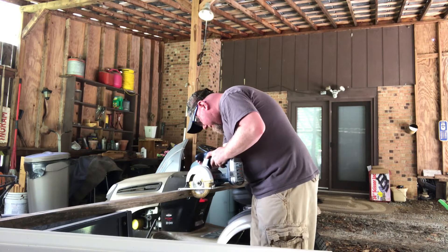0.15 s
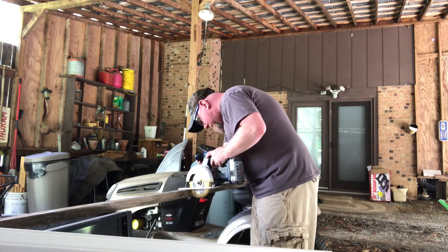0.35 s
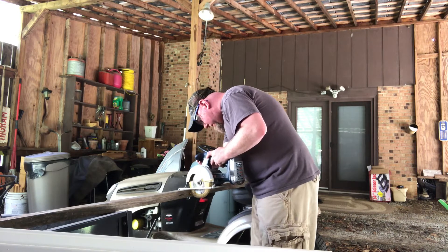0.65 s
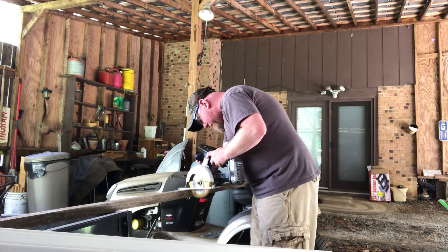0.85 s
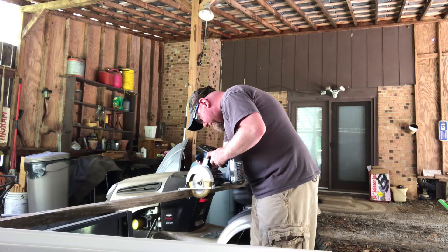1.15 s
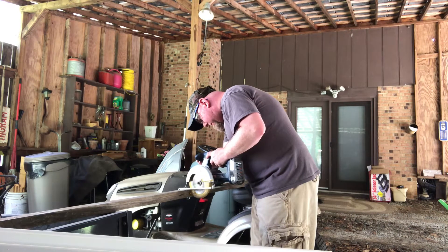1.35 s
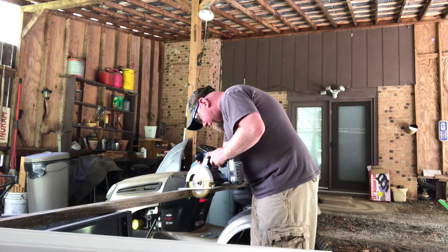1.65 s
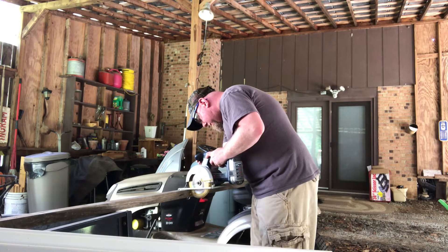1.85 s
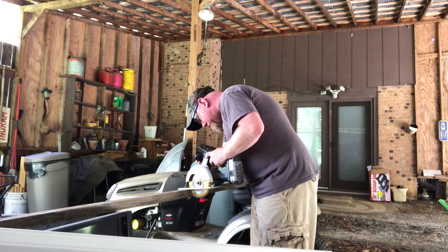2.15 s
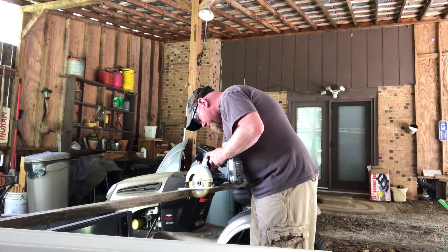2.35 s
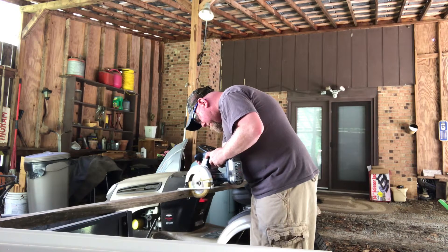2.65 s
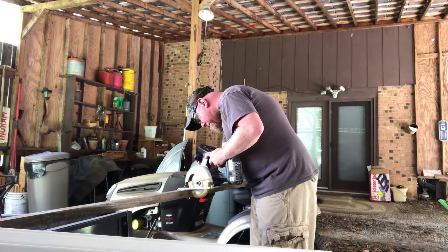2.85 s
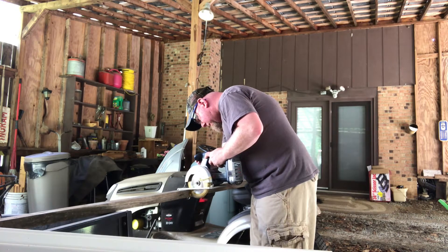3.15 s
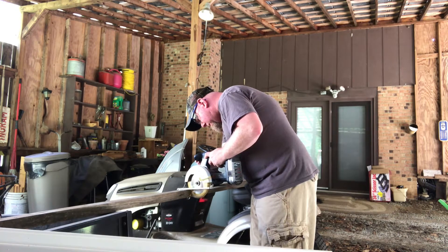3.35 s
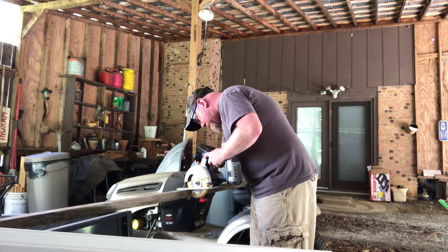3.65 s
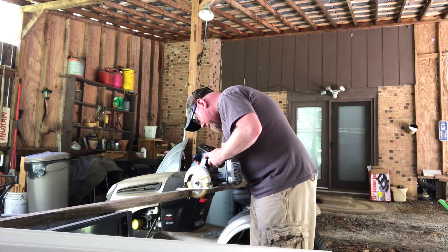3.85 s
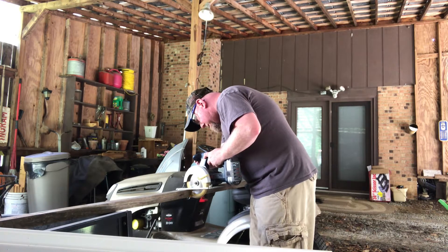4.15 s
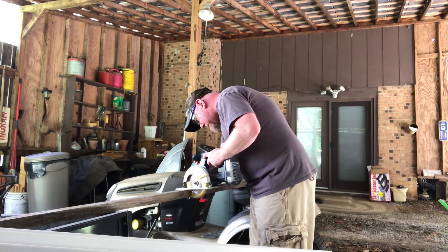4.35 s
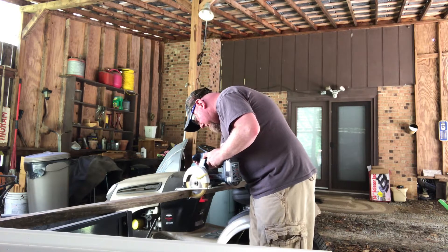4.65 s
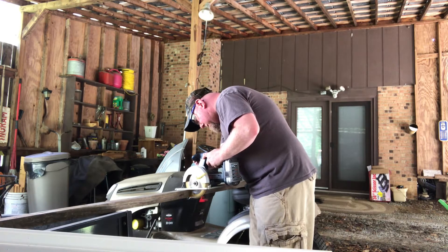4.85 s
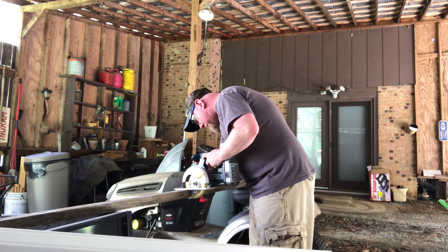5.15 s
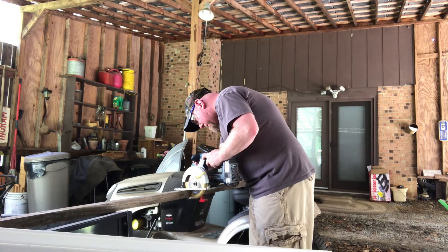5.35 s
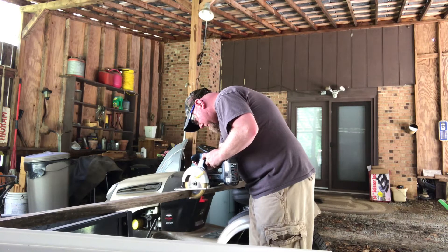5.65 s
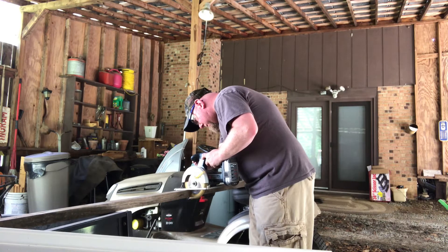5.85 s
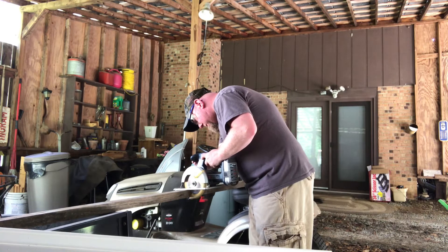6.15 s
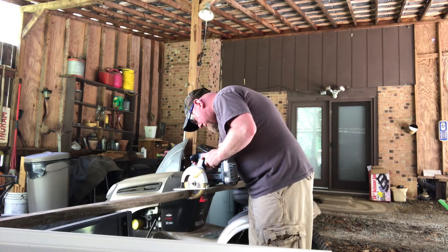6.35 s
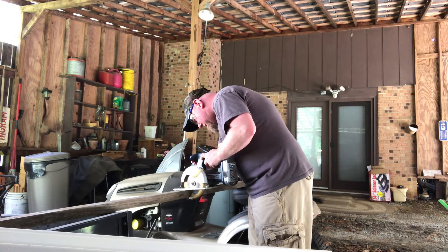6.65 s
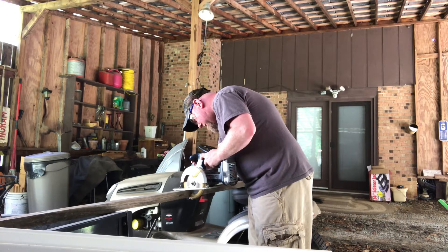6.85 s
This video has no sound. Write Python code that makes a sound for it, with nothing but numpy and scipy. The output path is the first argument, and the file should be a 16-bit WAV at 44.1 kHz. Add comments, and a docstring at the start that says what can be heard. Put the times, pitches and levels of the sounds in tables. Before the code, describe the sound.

Nearly a second of quiet: low outdoor rumble, thin insect hiss and a few light ticks against wood. A cordless circular saw jolts on with hard knocks, whirs up quickly, then touches the board. The blade rings and rasps lightly, then bites harder, becoming a loud screeching, howling cut that sags in pitch and keeps running to the end. Fairly close microphone in an open carport with short reflections.

```python
"""A circular saw clatters into motion, spins up and cuts a board in a carport.
Light contact rings the steel blade; deeper in, tooth impacts excite rasp, screech and bending modes.
A tone at the tooth rate howls near blade resonances while the loaded motor slows.
Gears, brushes, rotor and fan follow the motor's turns; filtered noise and decaying blows add knocks.
Insects and a low outdoor rumble, made of coloured noise, lie beneath and are plainest before the start."""
import sys
import numpy as np
from scipy import signal
from scipy.fft import rfft, irfft, next_fast_len
from scipy.io import wavfile
from scipy.ndimage import map_coordinates

SR = 44100
rng = np.random.default_rng(int(sys.argv[2]) if len(sys.argv) > 2 else 0)


def log_audio(samples):
    """Write samples as a 16-bit WAV file to the path given in sys.argv[1]."""
    # one column per channel
    frames = np.atleast_2d(samples).T
    # limit to full scale, then quantise
    limited = np.clip(frames, -1, 1)
    pcm = np.round(limited * 32767).astype(np.int16)
    wavfile.write(sys.argv[1], SR, pcm)


N = 308259

TEETH, GEAR_RATIO = 24, 14 / 3  # motor turns per blade turn
START_S = .885  # trigger pulled
FREE_SPEED = 338.5  # motor turns per second without load
CONTACT_S, ENTERED_S = 1.36, 1.54  # teeth first touch the board, and are fully on it

# Bending modes of the blade: mode_hz, width_hz, relative_db
BENDING_MODES = [(1310, 50, -10), (1372, 35, -3), (1440, 24, 1), (1555, 40, -2), (1630, 24, -4)]
# How hard the teeth bite: time_s, bite_db
BITE_FORCE = [(1.45, -35), (1.48, -30), (1.83, -27), (1.93, -34), (2.03, -28), (2.13, -32), (2.2, -22),
              (2.36, -20), (2.5, -30), (2.82, -19), (3.28, -24), (3.45, -21), (3.82, -23), (3.87, -18),
              (4.19, -21), (4.27, -15), (4.94, -18), (6.98, -19)]


def amp(db):
    """Logarithmic level: decibels to linear gain."""
    return 10 ** (np.asarray(db) / 20)


def unit(x):
    """Power normalisation: scale to rms 1."""
    return x / np.sqrt(np.mean(x ** 2) + 1e-20)


def along(points, hz):
    """Logarithmic frequency: read (Hz, value) points on a log axis."""
    f, v = np.transpose(points)
    return np.interp(np.log(hz + 1), np.log(f + 1), v)


def curves(rows):
    """Linear interpolation: one value per sample for each column after the time."""
    s, *cols = np.transpose(rows)
    return [np.interp(np.arange(N) / SR, s, c) for c in cols]


def ramp(start, end):
    """Linear onset: rises from 0 to 1 between two times."""
    return np.clip((np.arange(N) / SR - start) / max(end - start, 1 / SR), 0, 1)


def blows(events):
    """Exponential decay: each (s, dB, length s) blow falls by 60 dB in its length."""
    t = np.arange(N) / SR
    return sum((t >= s) * amp(db - 60 * np.abs(t - s) / length) for s, db, length in events)


def swells(events):
    """Gaussian modulation: sum of (s, dB, half-length s) bell-shaped level changes, in dB."""
    t = np.arange(N) / SR
    return sum(db * np.exp(-((t - s) / half) ** 2) for s, db, half in events)


def wobble(rate):
    """Band-limited fluctuation: a smooth random curve with rate knots a second."""
    knots = rng.standard_normal(int(N * rate / SR) + 4)
    return map_coordinates(knots, [np.arange(N) * rate / SR])


def noise():
    """Flat power spectrum: fresh white noise."""
    return rng.standard_normal(N)


def filtered(x, response):
    """Linear filtering: multiply the spectrum of x by a response of frequency."""
    size = next_fast_len(N + SR // 2)
    return irfft(rfft(x, size) * response(np.fft.rfftfreq(size, 1 / SR)), size)[:N]


def coloured(x, spectrum):
    """Spectral shaping: x through a broad (Hz, dB) spectrum, at rms 1."""
    return unit(filtered(x, lambda hz: amp(along(spectrum, hz))))


def resonate(x, modes):
    """Modal superposition: x through (Hz, width Hz, dB) modes, weak below the lowest, at rms 1."""
    lowest = min(mode[0] for mode in modes)

    def response(f):
        total = 0
        for k, (centre, width, db) in enumerate(modes):
            damping = 1j * f * width
            # neighbouring modes have opposite signs
            total = total + (-1) ** k * amp(db) * damping / (centre * centre - f * f + damping)
        return total * np.minimum(f / lowest, 1) ** 2

    return unit(filtered(x, response))


def impacts(cycles, depth):
    """Amplitude modulation: noise that bursts once a cycle, at rms 1."""
    return unit(noise() * np.exp(depth * np.cos(2 * np.pi * cycles)))


def outdoors():
    """Superposed noise bands: distant rumble, faint drone, insects and a brief thin tone."""
    # Rumble level: time_s, level_db
    rumble_level = [(0, -57.5), (2.3, -59.5), (4.6, -56), (5.6, -66), (6.99, -66)]
    # Rumble spectrum: frequency_hz, relative_density_db
    rumble_spectrum = [(20, -56), (54, -1.5), (100, -4.5), (175, -8), (250, -15.5), (430, -22), (560, -18),
                       (740, -24), (950, -21), (1200, -26), (2500, -31), (4500, -38), (6000, -38),
                       (12000, -52)]
    # Insect band: frequency_hz, relative_density_db
    insect_spectrum = [(6000, -37), (7100, -13), (7850, 0), (8300, -9), (9000, -32), (14000, -42)]
    rumble_db, = curves(rumble_level)
    rumble = amp(rumble_db) * coloured(noise(), rumble_spectrum)
    drone = amp(-73) * resonate(noise(), [(555, 8.3, 0)])
    insects = amp(-62.0) * coloured(noise(), insect_spectrum)
    thin_db, = curves([(.25, -100), (.4, -72), (.62, -72), (.76, -73), (.85, -95)])
    thin = amp(thin_db) * resonate(noise(), [(3210, 70, 0)])
    return rumble + drone + insects + thin


def carport(x):
    """Reverberation: roof and walls answer with decaying noise whose high treble dies first."""
    # Decay time of the reflections: frequency_hz, t60_s
    decay_times = [(200, 0.27), (2000, 0.32), (12000, 0.066)]
    hz, t, z = signal.stft(rng.standard_normal(SR // 2), SR, nperseg=256)
    decay = amp(-60 * t / along(decay_times, hz)[:, None])
    tail = signal.istft(z * decay, SR, nperseg=256)[1]
    return signal.fftconvolve(x, tail / np.linalg.norm(tail))[:N]


def handling():
    """Light impact: the saw's shoe ticks against the board as it is lined up."""
    # Ticks before the start: start_s, level_db, decay_60db_s
    ticks = [(.15, -73, .2), (.53, -53.5, 0.14), (.75, -66, .25)]
    return blows(ticks) * coloured(noise(), [(700, -25), (1700, -2), (6500, 0), (11000, -25)])


def squeak():
    """Phase modulation: a brief, slightly unsteady squeak in the cut rises quickly and fades."""
    pitch_hz, level_db = 1110, -36
    start_s, rise_s, fade_s = 5.63, .03, .28
    envelope = ramp(start_s, start_s + rise_s) * (1 - ramp(start_s, start_s + fade_s))
    phase = 2 * np.pi * pitch_hz * np.arange(N) / SR + .6 * wobble(25)
    return amp(level_db) * envelope * unit(np.sin(phase))


def backlash():
    """Impact excitation: slack gear teeth slam and shake the housing; the first jolt rings the guard."""
    # Knocks as the motor takes up the blade: start_s, level_db, decay_60db_s
    knocks = [(.8905, -18, .04), (.901, -23, 0.05), (.912, -19.5, 0.18), (.944, -19.5, 0.12),
              (.959, -28, 0.11), (.974, -22, 0.066), (1.029, -24, 0.24)]
    # Housing spectrum: frequency_hz, relative_density_db
    housing_spectrum = [(120, -56), (200, -26), (282, -26), (338, -49), (419, -31), (761, -50), (929, -7),
                        (1290, 1), (1750, -5.5), (3540, -12.5), (4310, 2), (4980, -51), (10300, -30),
                        (12300, -11), (15000, -17)]
    housing = blows(knocks) * coloured(noise(), housing_spectrum)
    guard_modes = [(3130, 150, -1), (3520, 140, -5), (4450, 110, -15)]
    guard = blows([(.8895, -20, 0.065)]) * resonate(noise(), guard_modes)
    return housing + guard


def rotor_hum(turns, speed):
    """Rotational harmonics: the rotor hums at one to three times its turn rate, louder with speed."""
    free_db, sag_db = -42.3, .32  # level at free speed; dB lost per turn a second below it
    # Brief dips in level: time_s, change_db, half_length_s
    dips = [(1.52, -14, .04), (2.85, -6, .08), (3.42, -11, .13), (5.85, -10, .2)]
    hum_db = free_db - sag_db * (FREE_SPEED - speed) + swells(dips)
    angle = 2 * np.pi * turns
    harmonics = np.sin(angle) + amp(-11) * np.sin(2 * angle) + amp(-17) * np.sin(3 * angle)
    return amp(hum_db) * unit(harmonics)


def fan_whistle(turns):
    """Blade-passing tone: a twelve-bladed fan on the rotor whistles, far fainter once cutting begins."""
    level_db, cutting_change_db = -36.5, -20
    entry_s, rise_s = 1.09, .08
    fan_db = level_db + cutting_change_db * ramp(1.45, 1.53)
    tone = unit(np.sin(12 * 2 * np.pi * turns))
    return ramp(entry_s, entry_s + rise_s) * amp(fan_db + wobble(26.6)) * tone


def gear_rattle(turns, speed, allowed_speed):
    """Contact modulation: gears rattle once a turn, more as they run up, less when load holds them."""
    free_db, sag_db = -29.7, 7.2  # level at free speed; dB lost when bogged down
    bogged_speed = 270  # motor turns per second
    # Gear spectrum: frequency_hz, relative_density_db
    gear_spectrum = [(88, -48), (150, -17), (199, -23), (320, -11), (363, -13.5), (564, -4.5), (773, -12.5),
                     (980, -5), (1060, -9.5), (1600, 2), (2190, -6.5), (2730, -2), (3860, -3.5),
                     (4740, -10.5), (6500, -16), (8450, -38), (14300, -120)]
    load = (FREE_SPEED - allowed_speed) / (FREE_SPEED - bogged_speed)
    run_up = (1 + speed / allowed_speed) / 2
    level = amp(free_db - sag_db * load ** 2) * run_up
    return level * coloured(impacts(turns, depth=0.46), gear_spectrum)


def brush_hiss(turns):
    """Commutation noise: brushes spark twice a turn, most strongly under the starting current."""
    # Brush spectrum: frequency_hz, relative_density_db
    brush_spectrum = [(4500, -8), (6400, -8), (7300, 2), (7750, -7), (8900, 6), (10500, -9), (12200, 4),
                      (14500, -6), (15800, -10)]
    surge = blows([(.94, -27, 2.4)])
    level = amp(-43) + surge
    return level * coloured(impacts(2 * turns, depth=0.41), brush_spectrum)


def motor(turns, speed, allowed_speed):
    """Source superposition: gear rattle and brush hiss start together just after the trigger is pulled."""
    running = ramp(START_S + .003, START_S + .007)
    return running * (gear_rattle(turns, speed, allowed_speed) + brush_hiss(turns))


def board(blade_turns):
    """Forced vibration: run-out shakes the board, its thrum moving from second to third order."""
    over_bite_db, from_s = -38, 2.75
    # The board shakes harder: time_s, change_db, half_length_s
    thrums = [(4.27, 6, .06), (6.38, 8, .06), (6.66, 6, .08)]
    bite_db, = curves(BITE_FORCE)
    shift, = curves([(5, 0.11), (5.4, 1)])
    angle = 2 * np.pi * blade_turns
    second = (1 - 0.91 * shift) * np.sin(2 * angle)
    third = (0.19 + 0.93 * shift) * np.sin(3 * angle)
    thrum = second + third + 0.39 * np.sin(4 * angle)
    wood = resonate(noise(), [(135, 17, -0.88), (162, 24, 0), (253, 12, -1.2)])
    level = amp(bite_db + over_bite_db + swells(thrums) + 1.7 * wobble(12))
    return ramp(from_s, from_s + .1) * level * (thrum + wood / 2)


def howl(blade_turns, tooth_hz):
    """Resonance: the tooth-rate tone swells at bending modes; unequal teeth add lines one turn rate apart."""
    # Drive of the howl on a bending mode: time_s, drive_db
    push = [(3.8, -40), (4.1, -18.5), (4.45, -18.5), (4.97, -13.5), (5.25, -21), (5.52, -20), (5.85, -28),
            (6.14, -13), (6.35, -20), (7, -28)]
    push_db, = curves(push)
    in_tune = sum(amp(db) / (1 + (2 * (tooth_hz - hz) / width) ** 2)
                  for hz, width, db in BENDING_MODES)
    load, = curves([(3.6, 0.02), (4.3, 1)])
    angle = 2 * np.pi * blade_turns
    tooth = TEETH * angle + .12 * wobble(70)
    tone = in_tune * amp(push_db + .8 * wobble(60)) * unit(np.sin(tooth))
    octave_db = -44 + swells([(5.3, 14, .15)])  # the octave sings out where the motor first bogs down
    octave = amp(octave_db + 2.2 * wobble(7)) * unit(np.sin(2 * tooth + 0.33 * wobble(34)))
    unequal = sum(amp(-46 + 4 * wobble(7)) * np.sin(order * angle + wobble(9))
                  for order in range(22, 43))
    return ramp(CONTACT_S, ENTERED_S) * (tone + load * (octave + amp(-1) * unequal))


def follow(bite_db, grows):
    """Power-law growth: a layer gains grows dB per dB of bite, pivoting on a full cut."""
    full_bite_db = -19
    return full_bite_db + grows * (bite_db - full_bite_db)


def torn_wood(bite_db, strikes):
    """Fracture noise: teeth tear fibres into a rasp and grab at the board's edge."""
    # Grabs at the edge: start_s, level_db, decay_60db_s
    catches = [(1.523, -27, 0.12), (1.603, -26, 0.14), (1.744, -27, 0.15), (1.829, -27, 0.14),
               (2.069, -34, .14), (2.259, -20, 0.1), (2.316, -25, 0.12), (2.357, -25, 0.084)]
    # Torn wood spectrum: frequency_hz, relative_density_db
    rasp_spectrum = [(60, -48), (130, -29), (750, -19.5), (1200, -2), (2500, -1.5), (3100, -3.5), (4500, 2),
                     (5200, 2.5), (6000, 3.5), (7700, -2), (8550, 5.5), (10700, -3), (11400, 3.5),
                     (13600, 4), (15800, 0.5)]
    rasp_db = np.minimum(follow(bite_db, 1.3), bite_db) + 1.2
    return (amp(rasp_db) + blows(catches)) * coloured(strikes(), rasp_spectrum)


def kerf_modes(bite_db, strikes):
    """Modal excitation: tooth blows drive blade modes in the kerf, stronger with depth."""
    # Blade modes in the kerf, besides the rim's: mode_hz, width_hz, relative_db
    modes = [(2450, 45, -12), (3400, 80, -7), (3880, 40, -6), (4950, 80, -5), (5640, 70, -1), (5985, 55, 1),
             (6800, 60, -5), (7295, 40, -6), (8440, 120, -5), (8740, 80, -3), (10100, 90, -5),
             (11300, 120, -7), (13500, 200, -8)]
    depth_db, = curves([(2, -10), (3.4, -2), (4.5, 0)])
    return amp(bite_db - 2.8 + depth_db) * resonate(strikes(), modes)


def rim_screech(bite_db, strikes):
    """Frictional damping: the kerf broadens the rim's two sharp modes into a growing screech."""
    # Rim modes in the kerf: mode_hz, width_hz, relative_db
    pinched_modes = [(4174, 110, 0), (4310, 42, -4), (4315, 77, -5), (4455, 110, -1.5)]
    # The rim rubs the side of the kerf and squeals: time_s, change_db, half_length_s
    rubs = [(1.85, 12, .025), (2.355, 7, .04), (2.63, 4, .025), (3.25, 5, .12), (3.47, 5, .02),
            (3.6, 5, .025), (3.71, 5, .025), (3.93, 3, .025), (4.14, 4, .025)]
    pinched, = curves([(3.3, 0.044), (4.8, 0.96)])
    sharp = resonate(strikes(), [(4165, 22, -1.3), (4280, 24, 0.51)])
    broad = resonate(strikes(), pinched_modes)
    rim = np.sqrt(1 - pinched) * sharp + np.sqrt(pinched) * broad
    bind_db = 4.5 * ramp(4.3, 6.5)  # the kerf closes on the rim
    return amp(follow(bite_db, 1.05) - 3.6 + bind_db + swells(rubs)) * rim


def blade_flex(bite_db, strikes):
    """Bending resonance: tooth blows flex the blade, more or less as it is steered."""
    # The blade is steered: time_s, change_db, half_length_s
    twists = [(2.68, 4.5, .13), (3.3, -4, .15), (3.66, 6, .15)]
    level = amp(follow(bite_db, 1.15) - 6.5 + swells(twists))
    return level * resonate(strikes(), BENDING_MODES)


def free_ring(bite_db):
    """Modal ringing: wavering sines and noise-driven steel modes, damped while the blade is buried."""
    # Modes of the free blade: mode_hz, relative_db
    blade_modes = [(2143, -36), (2676, -39), (3047, -44), (3192, -37), (3316, -40), (3424, -43),
                   (3666, -45), (3876, -38), (4048, -43), (4161, -36), (4269, -31), (4463, -43),
                   (4694, -48), (5060, -43), (5276, -41), (5604, -41), (5744, -45), (6029, -41),
                   (6298, -45), (6751, -46), (7321, -42), (8463, -42), (8791, -43), (9921, -43),
                   (10164, -48), (11316, -46), (11881, -48), (13501, -47)]
    # Ringing against the loosely followed bite: time_s, level_db
    ring_level = [(1.5, -9), (2.0, -4.5), (2.8, -.5), (3.3, -6), (4.2, -10), (4.7, -19), (7, -11)]
    t = np.arange(N) / SR
    steady = unit(sum(amp(db + 2 * wobble(14)) * np.sin(2 * np.pi * hz * t + .6 * wobble(25))
                      for hz, db in blade_modes))
    shaken = resonate(noise(), [(hz, 16, db) for hz, db in blade_modes])
    radiated = [(2140, -4), (2700, 1.5), (3900, 1.5), (4160, -1),
                (4270, -7), (4700, 2), (14000, 2)]  # Hz, dB
    ring_db, = curves(ring_level)
    # the steel rings on, so it follows the bite only loosely
    return amp(follow(bite_db, .6) + ring_db) * coloured(steady + shaken, radiated)


def cutting(blade_turns):
    """Common excitation: one bite drives every layer; grain and run-out make the tooth blows flutter."""
    bite_db, = curves(BITE_FORCE)
    chatter_db, = curves([(1.5, 3.6), (2.4, 1.5), (4, 0.64)])  # the kerf comes to guide the blade
    run_out_db = 0.2 * np.sin(2 * np.pi * blade_turns)
    grain = amp(chatter_db * wobble(80) + 0.63 * wobble(500) + run_out_db)

    def strikes():
        return grain * impacts(TEETH * blade_turns, depth=0.4)

    wood = torn_wood(bite_db, strikes)
    blade = kerf_modes(bite_db, strikes) + rim_screech(bite_db, strikes) + blade_flex(bite_db, strikes)
    return ramp(CONTACT_S, ENTERED_S) * (wood + blade + free_ring(bite_db))


def scene():
    """Exponential run-up under load: the motor turns the blade through a reduction gear, in two equal channels."""
    # Speed that the load allows: time_s, motor_turns_per_s
    load_speed = [(2.2, 338.5), (2.6, 335), (3.0, 330), (3.4, 322), (3.7, 323.5), (3.9, 314), (4.1, 310.5),
                  (4.3, 301.5), (4.52, 298.5), (4.87, 280), (5.15, 274.5), (5.43, 275.5), (5.65, 287),
                  (5.85, 295), (6.0, 289.5), (6.35, 264.5), (6.75, 269.5), (6.98, 265)]
    spin_up_s = .126  # time constant
    allowed_speed, = curves(load_speed)
    running_s = np.maximum(np.arange(N) / SR - START_S, 0)
    speed = allowed_speed * (1 - np.exp(-running_s / spin_up_s))
    turns = np.cumsum(speed) / SR
    blade_turns = turns / GEAR_RATIO
    tooth_hz = TEETH * speed / GEAR_RATIO
    clatter = motor(turns, speed, allowed_speed) + backlash() + cutting(blade_turns) + handling()
    tones = rotor_hum(turns, speed) + fan_whistle(turns)
    tones = tones + howl(blade_turns, tooth_hz) + board(blade_turns)
    reflected = amp(-6.5) * carport(clatter)
    mono = amp(-1.0) * clatter + reflected + tones + outdoors() + squeak()
    return np.array([mono, mono])


def record(dry):
    """Saturation and band limiting: round the highest peaks, then cut the top of the spectrum."""
    top_hz, edge_hz = 15750, 200  # middle and width of the cutoff
    rounded = dry / (1 + np.abs(dry / .9) ** 8) ** (1 / 8)

    def edge(hz):
        return np.clip((top_hz - hz) / edge_hz + .5, 0, 1)

    return np.array([filtered(channel, edge) for channel in rounded])


dry = scene()
out = record(dry)
log_audio(out)
```